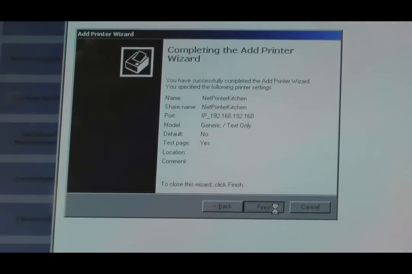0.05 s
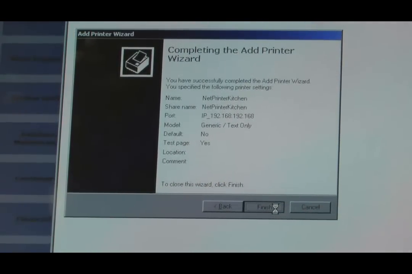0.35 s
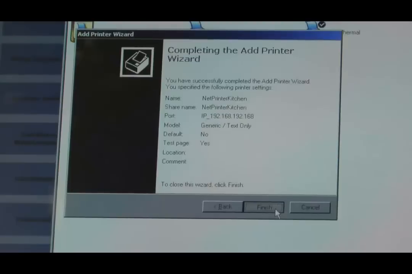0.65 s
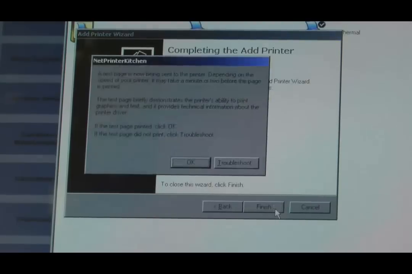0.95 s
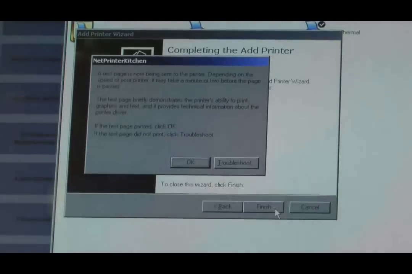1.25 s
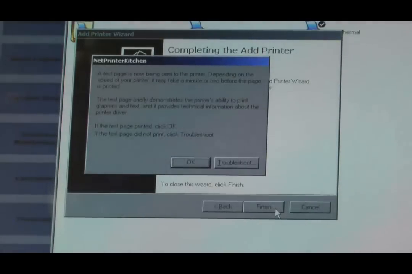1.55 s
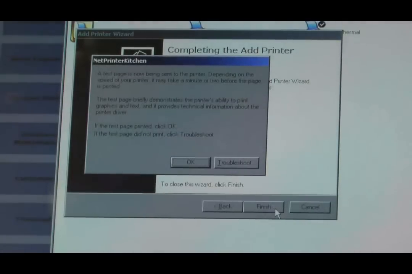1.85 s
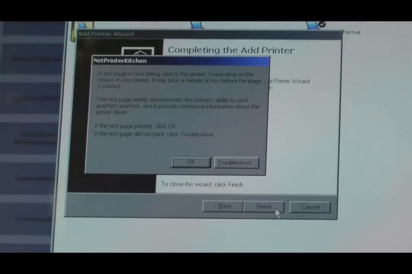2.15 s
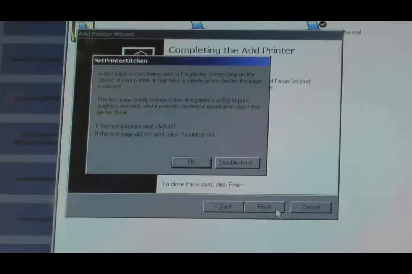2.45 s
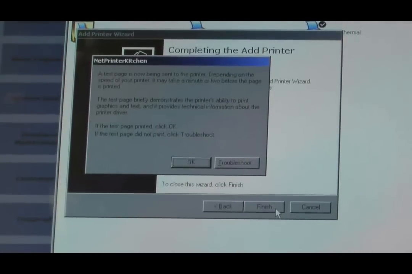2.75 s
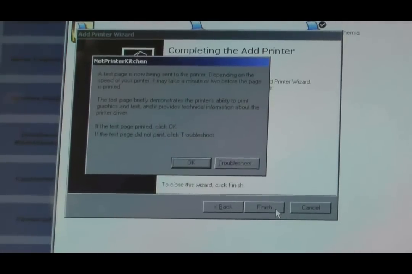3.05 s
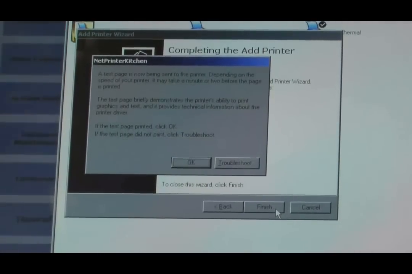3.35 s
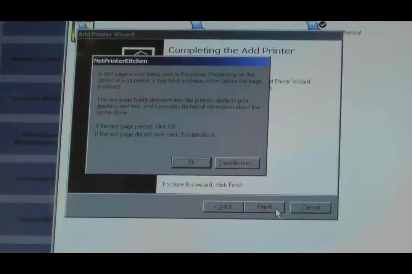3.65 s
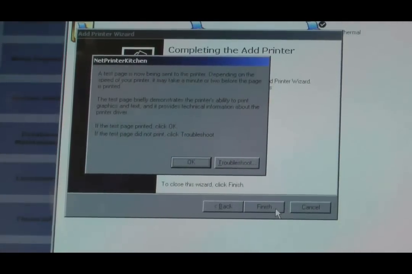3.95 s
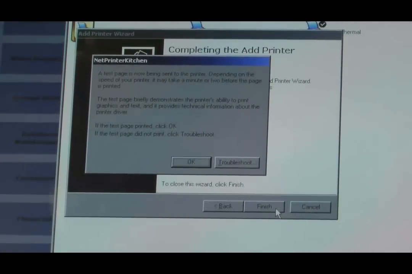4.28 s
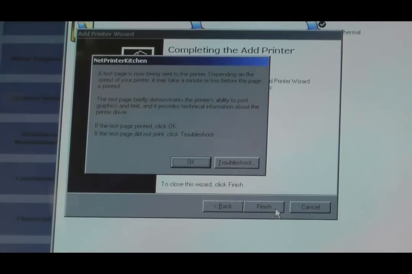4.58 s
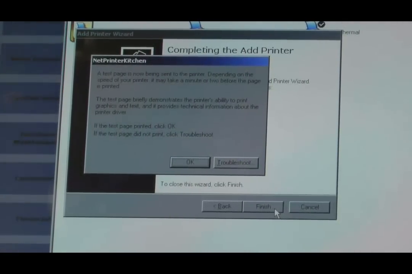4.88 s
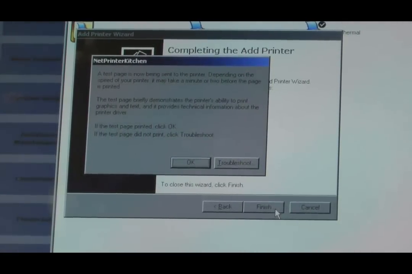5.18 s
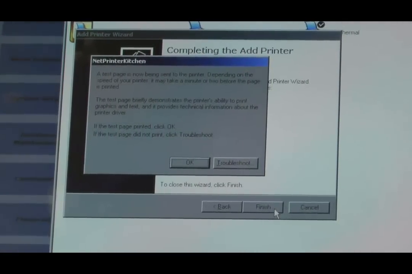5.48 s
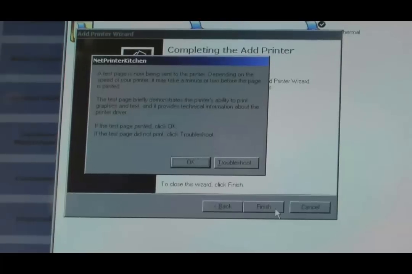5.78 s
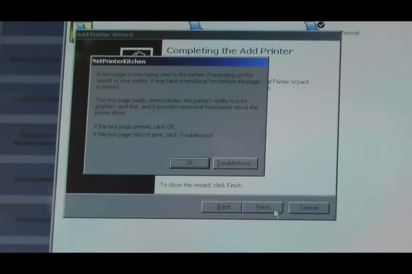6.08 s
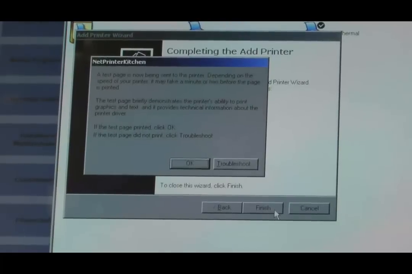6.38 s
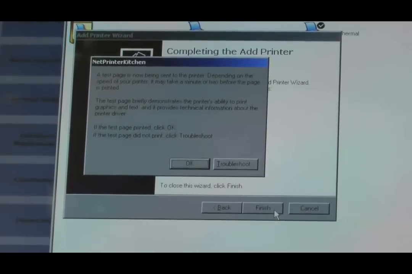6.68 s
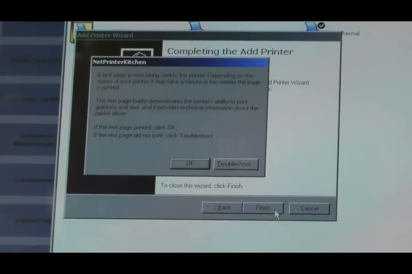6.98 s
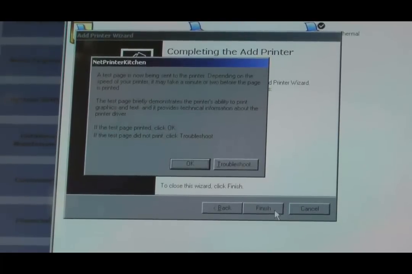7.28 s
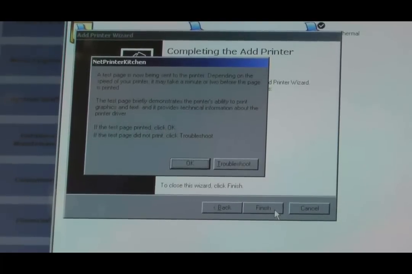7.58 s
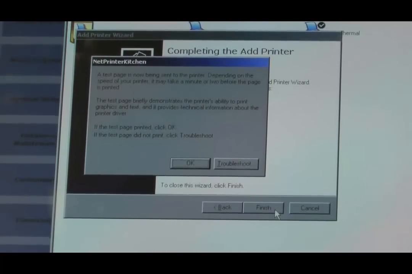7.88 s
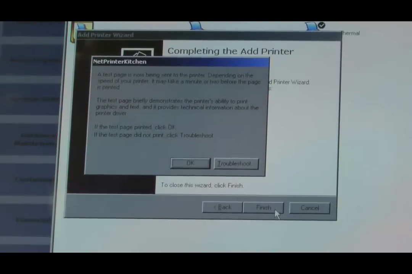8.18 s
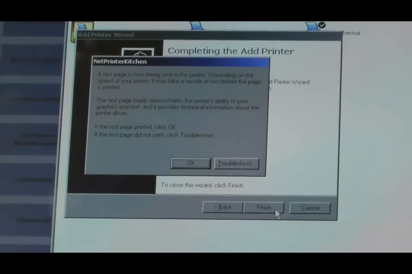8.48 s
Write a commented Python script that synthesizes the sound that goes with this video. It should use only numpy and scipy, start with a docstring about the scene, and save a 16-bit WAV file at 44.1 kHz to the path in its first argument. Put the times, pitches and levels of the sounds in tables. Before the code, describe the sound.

In a small, hard-walled room with a low hum, a nearby dot-matrix printer starts up after a few soft desk ticks. Clacks and two tiny squeaks come as the motor begins to growl. The print head then chatters through one short line after another, buzzing and whining, over rattling gears and occasional knocks. A single close microphone picks up a brief echo after the impacts.

```python
"""A small hard room with a low rumble, one microphone near a dot-matrix receipt printer.
After a few faint ticks at the desk the printer starts: a stepper growls in the plastic case, gears
rattle, loose parts clack, the chassis knocks and there are two squeaks. Nine pins fire in turn on a fixed
column clock and hammer out line after line, while the head buzzes and whines. Between lines the carriage
turns, with a clack if the turn is quick. The close walls ring on after the impacts."""
import sys
import numpy as np
from scipy import signal
from scipy.fft import rfft, irfft
from scipy.io import wavfile
from scipy.ndimage import uniform_filter1d

SR = 44100
rng = np.random.default_rng(int(sys.argv[2]) if len(sys.argv) > 2 else 0)


def to_wav(sig):
    """Store sig (one row per channel, or 1-D mono) as 16-bit WAV at the path in sys.argv[1].

    Samples outside -1..1 are clipped; the rate is SR.
    """
    pcm = np.clip(np.atleast_2d(sig), -1, 1) * 32767
    pcm = np.round(pcm).astype(np.int16)
    wavfile.write(sys.argv[1], SR, pcm.T)  # frames by channels


N = 376173
T = np.arange(N) / SR
START_S, COLUMN_HZ = 1.3, 241.15  # the motor starts; columns of dots per second

# Passes of the head, one per printed line. Each row: start and end in seconds, then relative levels
# in dB of the first strikes, the last strikes and the whine at mid-line.
PRINTED_LINES = [(1.488, 1.511, -27.5, -25.5, -30), (1.68, 1.703, -27, -30, -33),
                 (1.885, 1.93, -25.5, -28.5, -32), (2.099, 2.132, -29, -28, -36),
                 (2.241, 2.307, -26, -26, -35), (2.455, 2.601, -26.5, -28.5, -33),
                 (2.681, 2.825, -29, -24, -30), (2.949, 3.084, -23, -28, -29),
                 (3.178, 3.322, -25, -25, -31), (3.422, 3.563, -25, -28, -30),
                 (3.679, 3.828, -27, -24, -30), (4.022, 4.033, -27, -27, -36),
                 (4.143, 4.247, -27, -23, -34), (4.351, 4.489, -25, -27, -29), (4.582, 4.73, -26, -26, -35),
                 (4.862, 4.937, -25, -28, -31), (5.028, 5.172, -26, -25, -33),
                 (5.294, 5.375, -28, -26, -26), (5.469, 5.61, -27, -24, -29), (5.767, 5.935, -27, -26, -26),
                 (6.075, 6.186, -25, -26, -23), (6.279, 6.377, -27, -25, -26), (6.49, 6.605, -24, -26, -25),
                 (6.699, 6.809, -25, -23, -27), (6.928, 7.016, -26, -27, -29),
                 (7.106, 7.24, -26.5, -25, -31), (7.347, 7.494, -27, -26, -31),
                 (7.585, 7.598, -29, -29, -35), (7.781, 7.922, -26, -22, -32),
                 (8.029, 8.172, -24.5, -25, -29), (8.283, 8.382, -24, -24, -30),
                 (8.501, 8.529, -23, -23, -26)]


def undb(db):
    """Decibels to gain."""
    return 10 ** (np.asarray(db) / 20)


def unit(x):
    """Scale to rms 1."""
    return x / np.sqrt(np.mean(x ** 2))


def noise(size=N):
    """White noise."""
    return rng.standard_normal(size)


def walk(per_s):
    """Random drift of rms 1 that takes a new course per_s times a second."""
    return unit(np.interp(T * per_s, np.arange(4096), noise(4096)))


def curve(rows):
    """Join rows of (seconds, value) by straight lines."""
    return np.interp(T, *np.transpose(rows))


def ring(x, response):
    """Pass a sound through an impulse response."""
    return signal.oaconvolve(x, response)[:len(x)]


def colour(x, points):
    """Minimum-phase filter through (Hz, dB) points; white noise keeps its power."""
    hz, db = np.transpose(points)
    f = np.fft.rfftfreq(8192, 1 / SR)
    roll_off_db = np.interp(f, [11400, 12500], [0, -40])
    gain = unit(undb(np.interp(np.log(f + 1), np.log(hz), db) + roll_off_db))
    cepstrum = irfft(np.log(gain))
    cepstrum[1:4096] *= 2
    cepstrum[4097:] = 0
    return ring(x, irfft(np.exp(rfft(cepstrum))))


def burst(t60, size=4096):
    """Dense modes dying together, with energy 1."""
    modes = noise(size) * undb(-60 * np.arange(size) / SR / t60)
    return modes / np.linalg.norm(modes)


def taps(times, sizes):
    """Impulses, each shared between two neighbouring samples."""
    whole, part = np.divmod(np.clip(times * SR, 0, N), 1)
    whole = whole.astype(int)
    before = np.bincount(whole, sizes * (1 - part), N + 2)
    after = np.bincount(whole + 1, sizes * part, N + 2)
    return (before + after)[:N]


def resonate(x, hz, width_hz):
    """One resonance, gain 1 at its centre."""
    return signal.lfilter(*signal.iirpeak(hz, hz / width_hz, SR), x)


def tone(hz, waver_hz):
    """An unsteady sine of rms 1."""
    return np.sqrt(2) * np.sin(2 * np.pi * np.cumsum(hz + waver_hz * walk(90)) / SR)


def linger(gain, seconds):
    """An envelope whose energy builds up and dies away with this time constant."""
    pole = np.exp(-1 / (seconds * SR))
    return np.sqrt(signal.lfilter([1 - pole], [1, -pole], gain ** 2 + 1e-18))


def clack_colour(x):
    """The timbre that the desk ticks and the printer's clacks share."""
    # Spectrum of a small hard impact. Each row: frequency in Hz, relative level in dB.
    spectrum = [(200, 1), (600, -6), (1000, -6), (1700, 2), (3000, -5.5), (4300, -9), (7500, -11),
                (10800, -20.5)]
    return colour(x, spectrum)


def room_tone(air_db=-40.5, hum_db=-49):
    """Faint air all round, with a low rumble and mains hum that swell together."""
    # Spectrum of the quiet room. Each row: frequency in Hz, relative level in dB.
    spectrum = [(20, -5), (27, -4), (33, -0.5), (45, -7), (75, -15), (120, -17), (200, -22.5), (300, -30),
                (460, -28.5), (900, -39), (2000, -46), (4000, -54), (11000, -58.5)]
    # Swell of the rumble and hum. Each row: time in seconds, gain in dB.
    swell = [(0, 1), (.45, 1), (.6, -6), (.85, -4), (.97, 0), (1.3, -2), (2.5, 3.5), (3.3, 5), (4, 0),
             (5.5, 2.5), (6.5, 1), (8.5, 1.5)]
    air = unit(colour(noise(), spectrum)) * undb(air_db)
    rumble = signal.sosfiltfilt(signal.butter(2, 110, fs=SR, output="sos"), air)
    hum = np.sqrt(2) * np.sin(2 * np.pi * 60 * T) * undb(hum_db + 2 * walk(4.6))
    return air - rumble + (rumble + hum) * undb(curve(swell))


def desk_ticks(t60=0.012):
    """Faint, fast-dying ticks at the desk before the printer starts."""
    # The ticks. Each row: start in seconds, relative level in dB.
    ticks = [(.128, -32), (.815, -36), (0.996, -33), (1.235, -36)]
    starts, db = np.transpose(ticks)
    return clack_colour(ring(taps(starts, undb(db)), burst(t60)))


def motor_effort(turn_lead_s=0.024, turn_s=0.027, dip_db=-2.5, throb_db=1.5):
    """Effort of the carriage motor in dB: it throbs, and eases off at the turn before each line."""
    # The motor's slow changes of effort. Each row: time in seconds, relative level in dB.
    drive = [(1.32, -44), (1.4, -39), (1.5, -27.5), (1.85, -32.5), (2.1, -29.5), (2.28, -24), (2.4, -32),
             (2.8, -26), (3.55, -28.5), (3.7, -25), (3.98, -33.5), (4.15, -26.5), (4.65, -29.5),
             (4.95, -26.5), (5.2, -28.5), (6.6, -28), (7.7, -30), (8.3, -26)]
    turning = sum(np.exp(-((T - start + turn_lead_s) / turn_s) ** 2) for start, *_ in PRINTED_LINES)
    return curve(drive) + dip_db * turning + throb_db * walk(24)


def stepper(effort_db, gain_db=-3.5, step_hz=441, scatter_db=3, widen=1.36):
    """Uneven motor steps shake the plastic case into a growl."""
    # Resonances of the case. Each row: frequency in Hz, nominal width in Hz, relative level in dB.
    case_modes = [(310, 19, -8.5), (409, 26.8, -4.5), (448.2, 32.8, -2), (481, 25, -11), (557, 54, -12.5),
                  (719.7, 13, -11)]
    steps = np.arange(4096) + np.cumsum(.27 * noise(4096))
    kicks = taps(steps / step_hz, undb(scatter_db * noise(4096)))
    growl = unit(sum(undb(db) * resonate(resonate(kicks, hz, widen * width), hz, widen * width)
                     for hz, width, db in case_modes))
    # the drive keeps its force, so the growl's random surges are levelled out
    strength = np.sqrt(uniform_filter1d(growl ** 2, size=4000) + .01)
    return growl / strength * undb(effort_db + gain_db)


def gears(effort_db, level_db=-36, follow=0.23, scatter_db=6, tooth_t60=0.019, parts=6, count=1500):
    """Teeth, ribbon and paper rattle in small ticks, each part with its own ring, louder under load."""
    # Spectrum of the loose mechanism. Each row: frequency in Hz, relative level in dB.
    spectrum = [(60, -9), (140, 2.5), (220, 2.5), (320, 1.5), (600, 3), (850, -0.5), (1100, -3.5),
                (1400, 4.5), (1850, 2), (3000, -5.5), (4200, -3), (5500, -14), (7500, -10.5), (10800, -31)]
    rattle = 0
    for _ in range(parts):
        times = rng.random(count) * N / SR
        sizes = undb(scatter_db * np.clip(noise(count), -2, 2))
        rattle = rattle + ring(taps(times, sizes), burst(tooth_t60))
    extra_db = effort_db - np.median(effort_db)
    spin_up = np.interp(T, [START_S, 1.45], [.45, 1])
    return unit(colour(rattle, spectrum)) * undb(level_db + follow * extra_db) * spin_up


def turn_clacks(quick_s=.15, lead_s=.015, db=-10):
    """A quick turn throws the carriage against its stop. Each row: time in seconds, relative dB."""
    starts, ends = np.transpose(PRINTED_LINES)[:2]
    pauses = starts[1:] - ends[:-1]
    return [(start - lead_s, db) for start in starts[1:][pauses < quick_s]]


def clacks(gain_db=11, t60=0.11, rise_s=0.002806):
    """Loose parts and the turning carriage scrape into their stops and chatter briefly."""
    # Stray clacks of the ribbon and paper feed. Each row: time in seconds, relative level in dB.
    feed_clacks = [(1.3034, -22), (1.3612, -18.5), (1.429, -9), (1.4687, -10), (1.5702, -12.5),
                   (1.8418, -18), (1.9535, -11), (2.17, -12.5), (2.8695, -13), (3.3488, -6), (3.9434, -17),
                   (4.0714, -9), (5.7211, -11), (5.9812, -8), (6.39, -6.5), (6.42, -7.5), (6.6212, -7),
                   (7.6736, -8.5), (7.71, -13.5), (7.749, -8.5), (7.9477, -5), (8.4006, -9)]
    attack = 1 - np.exp(-np.arange(4096) / SR / rise_s)
    chatter = 0
    for time, db in feed_clacks + turn_clacks():
        hit = taps(np.array([time - rise_s / 2]), undb([db]))
        chatter = chatter + ring(hit, attack * burst(t60))
    return undb(gain_db) * clack_colour(chatter)


def knocks_and_squeaks(gain_db=5.0, t60=0.12, relative_width=0.16):
    """Low knocks of the chassis and two short, high squeaks, each a narrow band of noise dying fast."""
    # The knocks and squeaks. Each row: start in seconds, relative level in dB, pitch in Hz.
    events = [(1.304, -34.5, 610), (1.573, -34, 1820), (1.613, -38, 1710), (2.215, -38, 230),
              (3.863, -34.5, 248), (3.871, -34.5, 684), (5.984, -34, 400), (6.623, -34, 423)]
    sounds = 0
    for start, db, hz in events:
        fade = undb(-60 * np.maximum(T - start, 0) / t60) * (T > start)
        sounds = sounds + undb(db) * fade * unit(resonate(noise(), hz, relative_width * hz))
    return undb(gain_db) * sounds


def while_printing(first_db, last_db):
    """Gain that slides from a first to a last level over each line; zero between lines and words."""
    # Spaces between words, where the pins rest. Each row: start and end in seconds.
    spaces = [(4.423, 4.435), (5.086, 5.096), (5.517, 5.536), (5.806, 5.899), (6.121, 6.137),
              (6.321, 6.346), (6.538, 6.556), (6.742, 6.767), (7.158, 7.174), (8.078, 8.09)]
    gain = np.zeros(N)
    for (start, end, *_), first, last in zip(PRINTED_LINES, first_db, last_db):
        span = (T >= start) & (T < end)
        gain[span] = undb(np.interp(T[span], [start, end], [first, last]))
    for start, end in spaces:
        gain[int(start * SR):int(end * SR)] = 0
    return gain


def pin_force(letters_per_s=48, spread_db=1.12):
    """How hard the pins hit: it follows the line's level, and each letter has its own weight of ink."""
    first_db, last_db = np.transpose(PRINTED_LINES)[2:4]
    return while_printing(first_db, last_db) * undb(spread_db * walk(letters_per_s))


def print_head(force, gain_db=2.5, scatter_db=2.0, gap_db=-3, pins=9):
    """The pins strike the platen in turn in each column; letter strokes make a pin repeat its dot."""
    # Spectrum of pins on the platen. Each row: frequency in Hz, relative level in dB.
    platen = [(150, -20), (400, -10), (720, -7), (1000, -10), (1200, -6), (1450, .5), (1750, -1),
              (2400, 1.5), (3000, -2.8), (3500, .5), (4400, -2.3), (6600, -2.3), (8600, -5.2), (10800, -4)]
    ink_chance, stroke_chance = .68, .3
    travel_hz, grain = 26, 1.25
    jitter_s, click_t60 = 2e-5, .009
    column = np.arange(int(N / SR * COLUMN_HZ))
    letter_gaps = undb(gap_db * (column % 5 == 0))  # a letter is five columns wide
    clicks, power = 0, 0
    for pin in range(pins):
        times = (column + pin / 10) / COLUMN_HZ + jitter_s * noise(len(column))
        held, fresh, choice = rng.random((3, len(column)))
        dots = np.where(choice < stroke_chance, held[column // 5], fresh) < ink_chance
        sizes = dots * letter_gaps * undb(scatter_db * noise(len(column)))
        power += np.mean(sizes ** 2) * COLUMN_HZ / SR
        strikes = sizes * np.interp(times, T, force)
        # each pin blends five clicks, shifting as the head slides and with the grain of paper and ribbon
        blend = np.array([np.interp(times * travel_hz, np.arange(256), noise(256)) for _ in range(5)])
        blend = blend + grain * noise(blend.shape)
        for share in blend / np.linalg.norm(blend, axis=0):
            clicks = clicks + ring(taps(times, strikes * share), burst(click_t60, size=512))
    return undb(gain_db) * colour(clicks, platen) / np.sqrt(power)


def clock_tones(force, gain_db=-10, linger_s=0.0021, flutter_db=2):
    """The even beat of the pins adds buzzing and shrill tones that linger briefly after each word."""
    # Tones of the striking head. Each row: multiple of the column rate, relative level in dB.
    harmonics = [(6, -8.5), (7, -14), (8, -5), (11, -28), (13, -46), (20, -1.5), (21, -28), (30, -6),
                 (40, -5.5)]
    buzz = sum(tone(multiple * COLUMN_HZ, waver_hz=11.3) * undb(db + flutter_db * walk(40))
               for multiple, db in harmonics)
    return undb(gain_db) * linger(force, linger_s) * buzz


def whine(gain_db=-3.5, flutter_db=3, swell_db=1.5, build_s=0.0022, room_db=-3, room_s=.055):
    """The head sings at the pin clock, rising and falling with the strikes; the room holds the note."""
    first_db, last_db, whine_db = np.transpose(PRINTED_LINES)[2:]
    slide_db = (last_db - first_db) / 2
    drive = while_printing(whine_db - slide_db, whine_db + slide_db)
    envelope = np.hypot(linger(drive, build_s), undb(room_db) * linger(drive, room_s))
    note = tone(10 * COLUMN_HZ, waver_hz=12.9)
    return note * envelope * undb(gain_db + flutter_db * walk(90) + swell_db * walk(25))


def walls(x, wet_db=-3.0, delay_s=0.00225, low_t60=.45, high_t60=.29, size=32768):
    """Close hard walls add a dense tail, a little under the direct sound; its treble dies first."""
    t = np.arange(size) / SR
    wash = noise(size)
    low = signal.sosfilt(signal.butter(1, 3000, fs=SR, output="sos"), wash)
    high = wash - low
    tail = (low * undb(-60 * t / low_t60) + high * undb(-60 * t / high_t60)) * (t > delay_s)
    reflections = undb(wet_db) * ring(x, tail / np.linalg.norm(tail))
    return (x + reflections) / np.hypot(1, undb(wet_db))


def scene():
    """The printer in its room as it reaches the one microphone, the same in both channels."""
    running = np.clip((T - START_S) / 0.0082, 0, 1)
    force, effort_db = pin_force(), motor_effort()
    short_sounds = walls(print_head(force) + clacks() + desk_ticks() + knocks_and_squeaks())
    head_tones = clock_tones(force) + whine()
    mechanism = running * (stepper(effort_db) + gears(effort_db))
    mono = short_sounds + head_tones + mechanism + room_tone()
    return np.array([mono, mono])


def record(dry):
    """The microphone drops the deepest bass, rounds the tallest peaks and cuts the top."""
    bottom_hz, top_hz, overdrive = 20, 10880, 1.6
    thin = signal.sosfilt(signal.butter(2, bottom_hz, "high", fs=SR, output="sos"), dry)
    rounded = np.tanh(overdrive * thin) / overdrive
    return signal.sosfilt(signal.ellip(12, .2, 70, top_hz, fs=SR, output="sos"), rounded)


dry = scene()
out = record(dry)
to_wav(out)
```